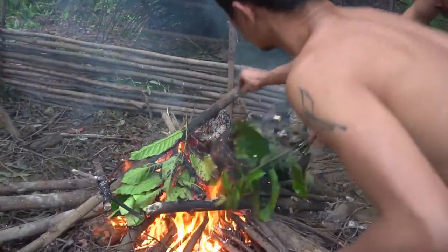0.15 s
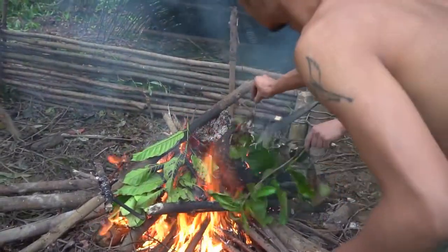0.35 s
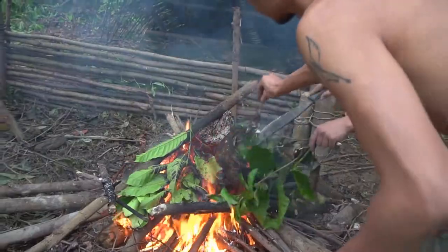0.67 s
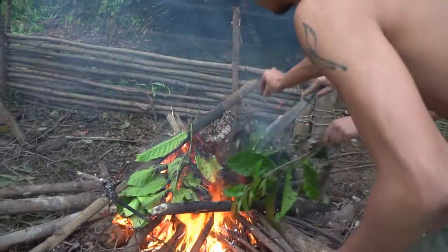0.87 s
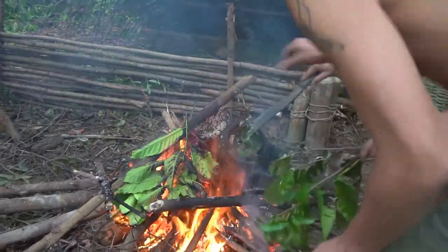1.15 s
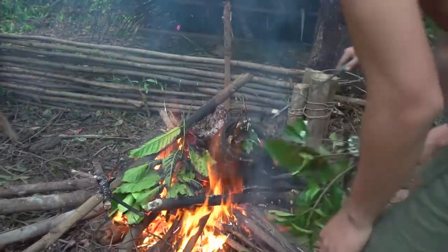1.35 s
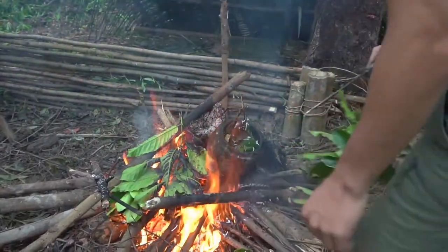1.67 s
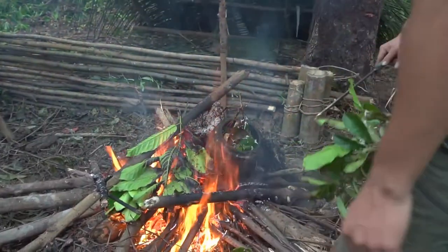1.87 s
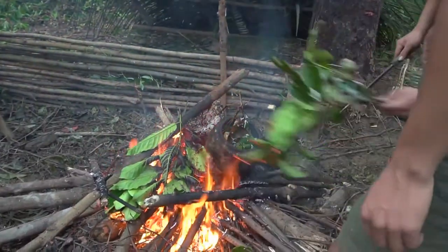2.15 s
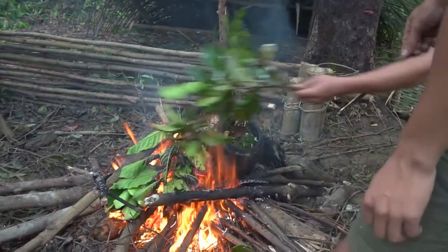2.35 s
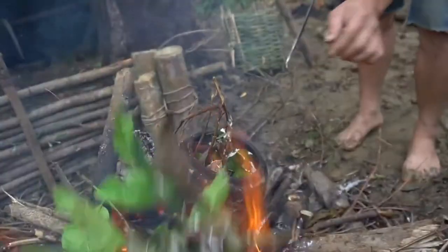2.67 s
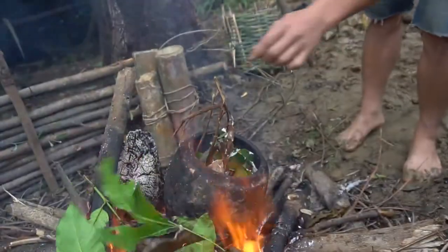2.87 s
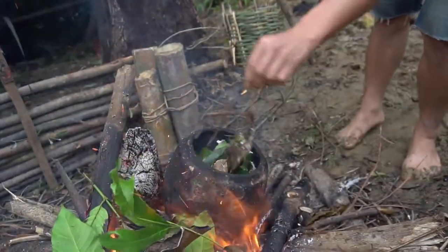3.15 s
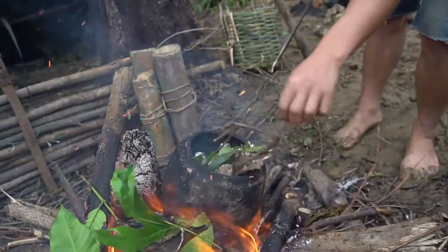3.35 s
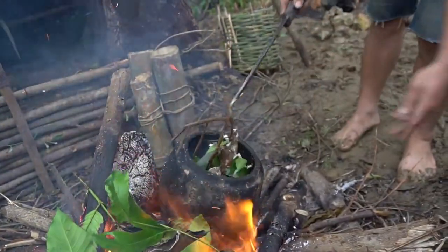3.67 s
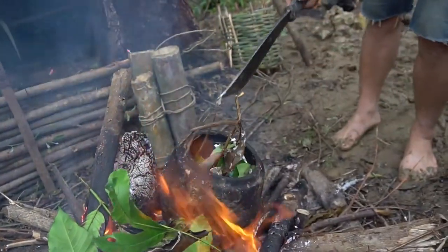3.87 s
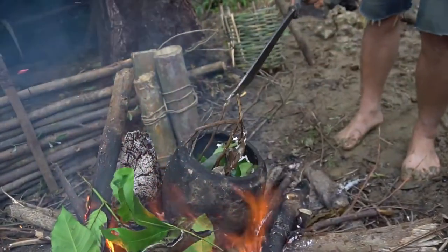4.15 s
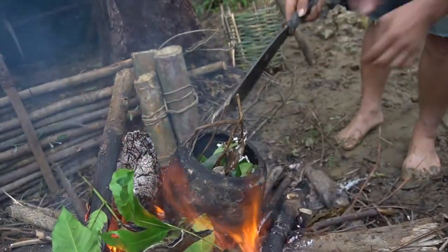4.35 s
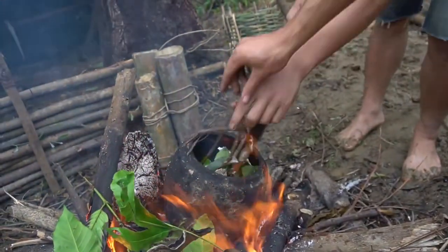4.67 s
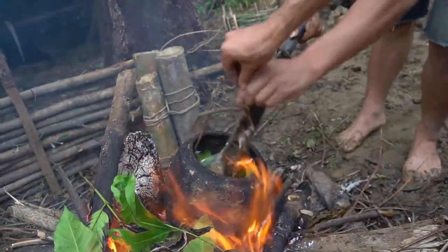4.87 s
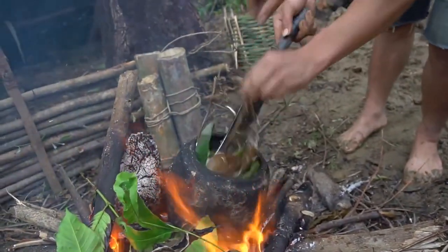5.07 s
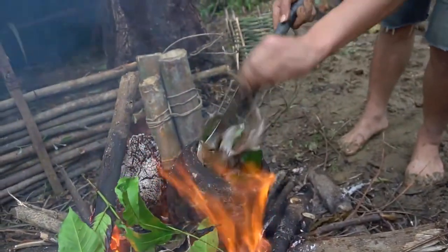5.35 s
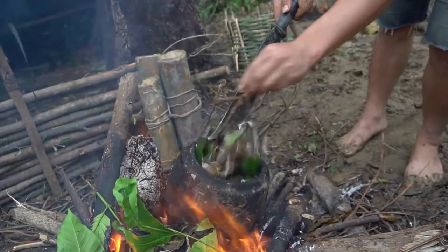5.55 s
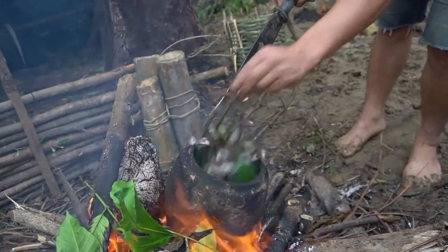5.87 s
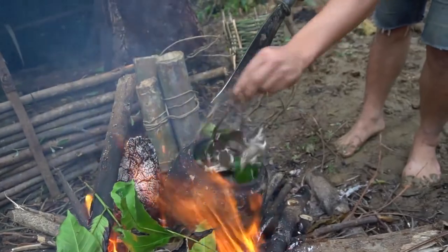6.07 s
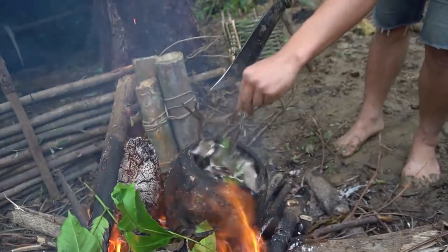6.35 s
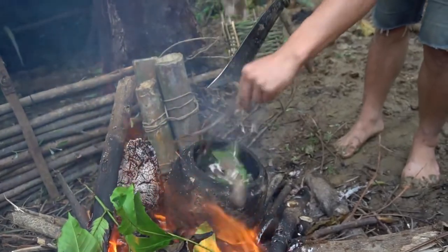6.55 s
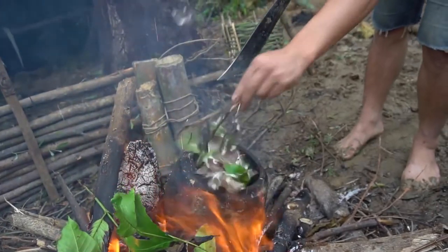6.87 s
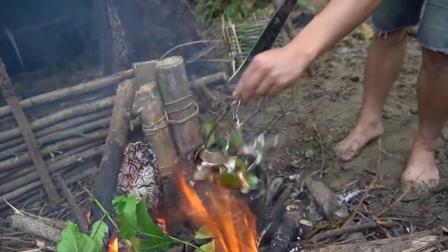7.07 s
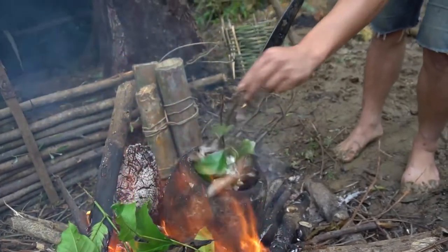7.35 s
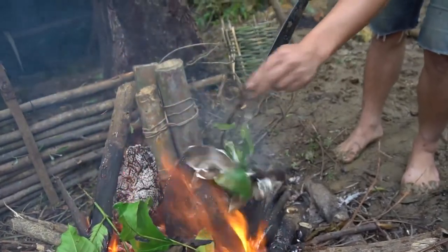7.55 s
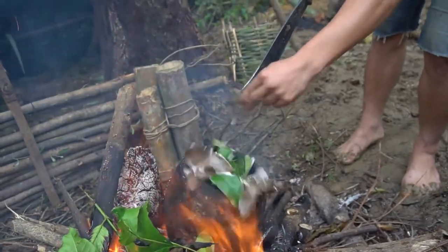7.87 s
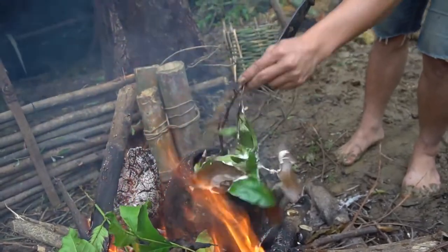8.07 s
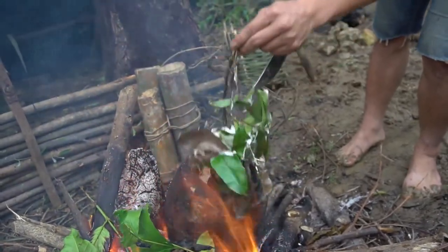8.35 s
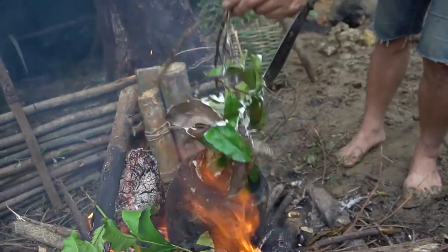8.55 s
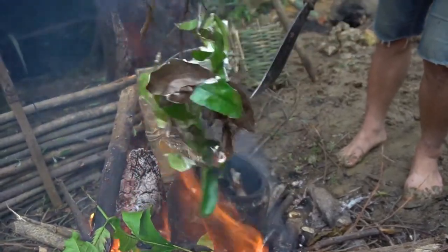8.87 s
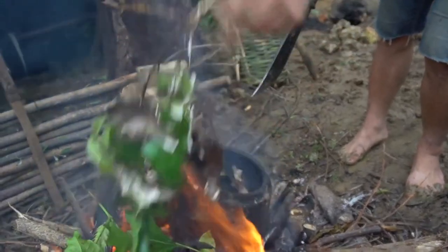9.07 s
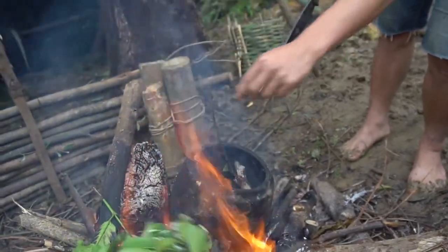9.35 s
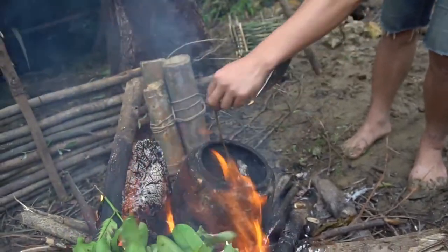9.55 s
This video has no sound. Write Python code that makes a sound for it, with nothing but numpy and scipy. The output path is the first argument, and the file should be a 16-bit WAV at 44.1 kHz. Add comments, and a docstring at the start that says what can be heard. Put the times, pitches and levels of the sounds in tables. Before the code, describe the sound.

Leafy twigs swish over the low flutter, steamy hiss and sharp pops of an open-air wood fire. Early on, a knife hits a metal pot and briefly scrapes the rim, slightly to the right. The rustling eases, then returns. About halfway, another ringing knock starts a stretch of stirring: the leaves rustle louder, the pot hums hollowly and twig tips plink against its wall. The rustle thins as the bunch is lifted out.

```python
"""A wood fire rumbles and hisses outdoors while leafy twigs rustle; sap pockets and green leaves pop.
A long knife knocks a metal pot with a dull boom and scrapes its rim, ringing both pot and blade.
Soft knocks follow and twig tips flick the wall. At a second knife knock the bunch goes into the pot
and is stirred: the hollow hums with the rustle and gulps as the bunch shifts, until it comes out."""
import sys
import numpy as np
from scipy import signal
from scipy.fft import rfft, irfft, next_fast_len
from scipy.io import wavfile
from scipy.ndimage import uniform_filter1d, map_coordinates

SR = 44100
rng = np.random.default_rng(int(sys.argv[2]) if len(sys.argv) > 2 else 0)


def generate_wav(sig):
    """Save sig (samples, or channels by samples) to the path in sys.argv[1] as 16-bit PCM at SR."""
    pcm = np.round(np.clip(np.atleast_2d(sig).T, -1, 1) * 32767).astype(np.int16)
    wavfile.write(sys.argv[1], SR, pcm)


N = 427769


def amp(db):
    return 10 ** (np.asarray(db) / 20)


def unit_rms(x):
    return x / np.sqrt(np.mean(x ** 2) + 1e-20)


def log_interp(points, hz):
    """Read (Hz, value) points on a log frequency axis."""
    point_hz, values = np.transpose(points)
    return np.interp(np.log(hz + 1), np.log(point_hz + 1), values)


def curves(rows):
    """One value per sample for each column after the time."""
    times_s, *columns = np.transpose(rows)
    return [np.interp(np.arange(N) / SR, times_s, column) for column in columns]


def wobble(rate_hz):
    """A smooth random curve."""
    knots = rng.standard_normal(int(N * rate_hz / SR) + 4)
    return map_coordinates(knots, [np.arange(N) * rate_hz / SR])


def filtered(x, response):
    size = next_fast_len(N + SR // 2)
    return irfft(rfft(x, size) * response(np.fft.rfftfreq(size, 1 / SR)), size)[..., :N]


def band(x, lo_hz, hi_hz):
    return signal.sosfilt(signal.butter(3, [lo_hz, hi_hz], "bandpass", fs=SR, output="sos"), x)


def spiky(per_s, spread_db, t60_s):
    """Envelope of tiny random bursts, a few much larger than the rest."""
    hits = (rng.random(N) < per_s / SR) * amp(spread_db * np.minimum(rng.exponential(size=N), 5))
    return unit_rms(signal.lfilter([1], [1, -amp(-60 / (t60_s * SR))], hits))


def rush(spectrum, likeness, envelope=1, patchy_db=0):
    """Stereo noise of rms 1, with optional louder and softer patches in time and frequency."""
    cells = signal.stft(envelope * rng.standard_normal((2, N)), nperseg=512)[2]
    patches = uniform_filter1d(rng.standard_normal(cells.shape[1:]), size=3, axis=0)
    patches = unit_rms(uniform_filter1d(patches, size=4, axis=1))
    noise = signal.istft(cells * amp(patchy_db * patches), nperseg=512)[1][:, :N]

    def mid_side_gains(hz):
        angle = np.arccos(np.clip(log_interp(likeness, hz), 0, 1)) / 2
        in_band = (hz > spectrum[0][0]) & (hz < spectrum[-1][0])
        return in_band * amp(log_interp(spectrum, hz)) * [np.cos(angle), np.sin(angle)]

    mid, side = filtered(noise, mid_side_gains)
    return unit_rms(np.array([mid + side, mid - side]))


def mix_at(starts, sounds):
    """Sum one sound per row, each from its start sample."""
    index = starts.astype(int) + np.arange(sounds.shape[1])
    return np.bincount(index.ravel(), sounds.ravel(), N)[:N]


def ticks(count, centre_hz, log_spread, cycles, spread_db):
    """Tiny contacts, each a damped sine of its own pitch, size and direction."""
    when, strength, direction = rng.random((count, 3)).T[:, :, None]
    hz = np.clip(centre_hz * np.exp(log_spread * rng.standard_normal((count, 1))), 1700, 15000)
    t = np.arange(300) / SR
    size = amp(spread_db * np.minimum(-np.log(1 - strength), 4))
    grains = size * np.sin(2 * np.pi * hz * t) * np.exp(-hz * t / cycles)
    pan = np.pi / 4 + 0.5 * (direction - 0.5)
    return unit_rms(np.array([mix_at(when * N, grains * gain) for gain in (np.cos(pan), np.sin(pan))]))


def ring(modes, level_db, tilt_db=0):
    """Modes decay after one blow; tilt_db per octave favours the high ones."""
    t = np.arange(SR // 2) / SR
    out = np.zeros(len(t))
    for hz, mode_db, t60_s in modes:
        start_db = level_db + mode_db + tilt_db * np.log2(hz / 1000) + rng.normal(0, 0.19)
        out += amp(start_db - 60 * t / t60_s) * np.sin(2 * np.pi * hz * t)
    return out


def pulse(start_s, level_db, hz, t60_cycles):
    """A short tone that builds within a cycle and dies away."""
    out, t = np.zeros(N + SR), np.arange(SR // 2) / SR
    attack = 1 - np.exp(-2 * hz * t)
    out[round(start_s * SR):][:len(t)] = attack * ring([(hz, 0, t60_cycles / hz)], level_db + 2)
    return out[:N]


# Flame strength. Each row: time in seconds, level in dB.
FLAME_LEVELS = [(0.0, -53), (8.43, -50), (9.7, -50.5)]
# Flame and steam spectra. Each row: frequency in Hz, density in dB.
RUMBLE_SPECTRUM = [(15, -44), (25, -9.5), (81, 0), (129, -1), (231, -5), (413, -20.5), (450, -15),
                   (580, -56), (990, -120)]
HISS_SPECTRUM = [(300, -26), (500, -2.5), (1200, -7.5), (1600, -0.5), (2400, -1), (6000, 1), (9000, 0.5),
                 (14400, 0.5), (15700, -2), (15900, -60)]
# Width of the fire. Each row: frequency in Hz, left-right likeness from 0 to 1.
FIRE_LIKENESS = [(40, .99), (120, 1), (300, 0.94), (1000, 0.083), (2200, 0.92), (4500, 0.37), (13000, 0.22)]


def fire():
    """Flames flutter in the bass; steam hisses from the wood with tiny spits."""
    rumble = amp(curves(FLAME_LEVELS)[0] + 2 * wobble(6)) * rush(RUMBLE_SPECTRUM, FIRE_LIKENESS)
    spits = amp(-56) * ticks(count=600, centre_hz=8800, log_spread=0.55, cycles=2.7, spread_db=1.5)
    hiss = amp(-48.5 + 1.1 * wobble(8)) * rush(HISS_SPECTRUM, FIRE_LIKENESS, patchy_db=3.5)
    return rumble + spits + hiss


# Steady stirring. Each row: time in seconds, rustle in dB, low rustle in dB above it.
STIRRING = [(0, -53, -10), (.3, -48.5, -22), (.62, -50.5, -6), (.8, -46.5, -8.5), (1.0, -48.5, -26),
            (1.25, -50.5, -7), (1.6, -59.5, -14.5), (2.7, -65, -13), (3.1, -53.5, -8), (4.2, -53.5, -14),
            (5.1, -48.5, -14), (5.25, -44.5, -4.5), (6.1, -39.5, -5), (7.0, -37.5, -6.5), (7.2, -45, -1.5),
            (7.9, -51.5, -0.5), (8.5, -53, -4.5), (8.7, -52, -14), (9.3, -59.5, -9.5), (9.7, -50.5, -10.5)]
# Sweeps of the bunch. Each row: peak time in seconds, level in dB, length in seconds, treble offset in dB.
SWEEPS = [(0.155, -44.5, 0.031, 1), (0.34, -44, 0.096, 1), (0.458, -36, 0.06, -4), (0.648, -36, 0.044, -6),
          (0.914, -51, .1, 10), (1.079, -33.5, 0.098, -3), (2.774, -46, 0.026, 4), (2.864, -32, .1, -3),
          (2.932, -38, 0.12, -3), (3.07, -41, 0.029, 7), (3.23, -56, 0.1, 7.5), (3.36, -52, .06, 6),
          (3.7, -48.5, 0.15, 1), (4.308, -43.5, 0.15, -3), (4.559, -40, 0.039, 0), (4.85, -52.5, 0.055, 5),
          (4.97, -45.5, .06, 1.5), (5.199, -34.5, 0.13, -0.5), (5.348, -35, 0.094, -4.5),
          (5.487, -37, 0.098, -8), (5.699, -32.5, 0.14, -2.5), (6.073, -33.5, 0.54, -2.5),
          (6.514, -33, 0.19, -0.5), (6.723, -35.5, 0.11, -3.5), (6.886, -32.5, 0.087, -11),
          (7.073, -28.5, 0.067, -5.5), (7.263, -35, 0.2, -5.5), (7.449, -37.5, .05, -2),
          (7.588, -40, 0.15, -5), (7.826, -40, 0.094, -11), (8.024, -38.5, 0.12, -3),
          (8.182, -42, 0.074, -8), (8.357, -49, 0.09, -12), (8.67, -49.5, 0.29, 5), (9.134, -53.5, .06, 8),
          (9.41, -38.5, 0.11, -2.5), (9.586, -46.5, 0.1, 3)]


def handling():
    """Sweeps swell over the stirring. Returns rustle, treble and low levels, and the share in the pot."""
    rise_db, fall_db = 19.5, 13  # per sweep length
    enter_s, leave_s, crossfade_s = 5.15, 8.62, 0.046
    t = np.arange(N) / SR
    steady_db, low_offset_db = curves(STIRRING)
    rustle_power, crisp_power = amp(2 * steady_db), amp(2 * (steady_db - 2))
    for peak_s, level_db, length_s, treble_db in SWEEPS:
        near = slice(max(round((peak_s - 1) * SR), 0), round((peak_s + 1) * SR))
        lengths = (t[near] - peak_s) / length_s
        power = amp(2 * (level_db + np.where(lengths < 0, rise_db, -fall_db) * lengths))
        rustle_power[near] += power
        crisp_power[near] += power * amp(2 * treble_db)
    rustle_db = 10 * np.log10(rustle_power)
    inside = np.clip(np.minimum(t - enter_s, leave_s - t) / crossfade_s, 0, 1)
    swell_share = 1 - 0.65 * inside  # only part of a swell reaches the hollow
    low_db = steady_db + swell_share * (rustle_db - steady_db) + low_offset_db
    return rustle_db, 10 * np.log10(crisp_power), low_db, inside


# Leaf spectra: body, treble, open-air lows. Each row: frequency in Hz, density in dB.
RUSTLE_SPECTRUM = [(500, -14), (900, -20), (1340, -11), (1430, -8.5), (2400, -5), (4000, -5), (6000, -8.5),
                   (9000, -15)]
CRISP_SPECTRUM = [(4000, -27), (6500, -8), (9000, -6), (14000, -14.5), (15700, -11), (15900, -64)]
LOW_SPECTRUM = [(250, -8), (450, -3.5), (700, -5), (1000, -8.5), (1340, -6)]
# Width of the bunch. Each row: frequency in Hz, left-right likeness from 0 to 1.
LEAF_LIKENESS = [(300, 1), (1000, 0.93), (2200, 1), (4500, 0.48), (13000, 0.56)]


def leaves():
    """Leaf and twig contacts are dense grains; the same grains sound low, crisp and in the pot."""
    rustle_db, crisp_db, low_db, inside = handling()
    grains = spiky(per_s=600, spread_db=3.5, t60_s=0.018)
    clumps = amp(1.65 * wobble(60))
    twigs = ticks(count=5000, centre_hz=3190, log_spread=0.408, cycles=4.6, spread_db=3)
    twigs = amp(-10.5 + 0.17 * (rustle_db - rustle_db.mean())) * band(twigs, 1700, 12600)
    body = rush(RUSTLE_SPECTRUM, LEAF_LIKENESS, clumps * (1.8 + grains), patchy_db=2.5)
    crisp = rush(CRISP_SPECTRUM, LEAF_LIKENESS, clumps * (1.16 + grains), patchy_db=2.5)
    open_air = rush(LOW_SPECTRUM, LEAF_LIKENESS, clumps * (0.72 + grains))
    low = inside * pot_hollow(grains) + (1 - inside) * open_air
    return amp(rustle_db) * (body + clumps * twigs) + amp(crisp_db) * crisp + amp(low_db) * low


# Sharp cracks: wood and sap pops, and the crack of the first knife knock. Each row: start in seconds,
# 3-6 kHz peak in dB, treble offset in dB, bass offset in dB, left over right in dB.
CRACKS = [(0.3457, -18, 5.5, -35, 0), (0.5697, -29, 8, -25, -3), (0.6362, -10, -4, -6.5, -3.5),
          (0.6875, -26, 7, -37, -7), (0.693, -11.5, 4.5, -46, -2), (0.7733, -21.5, 7.5, -16, -2),
          (0.8683, -22.5, 16, -8, -6), (0.877, -21.5, 16, -38, 9), (0.8842, -25, 15, -9, -8),
          (0.933, -25, 22.5, -14, 0), (0.9627, -24, 20, -21, -2), (0.99, -21.5, 17, -25, -1),
          (1.2533, -21.5, 6, -10, 0), (1.5358, -41.5, 21, -23, -1), (1.6619, -26, 9.5, -35, 0),
          (2.0266, -25.5, 10.5, -34, 0), (2.128, -35, 16, -25, 1), (2.222, -16.5, 2, -28, 1),
          (2.4952, -34, 15.5, -29, -1), (2.5532, -39.5, 21.5, -25, -1), (2.7459, -42, 19, -21, -2),
          (2.9868, -24, 9.5, -8, 1), (3.0558, -25, 6, -26, 6), (3.0672, -26, 3, 2.5, 1),
          (3.2834, -32.5, 11, -22, 1), (3.4019, -37.5, 14, -27, 0), (3.5468, -37, 16.5, -23, 2),
          (3.7088, -35, 14, -29, 3), (3.748, -33, -2, 1.5, 0), (3.85, -36.5, -8, 1.5, 0),
          (3.9036, -36, 12, -22, 0), (3.9322, -31, 13, -22, -5), (4.1618, -33, 13, -31, 1),
          (4.4489, -5, -10, -13.5, 0.5), (4.9795, -22.5, 1, -25, 4), (5.2663, -22, 6, -36, 0),
          (5.615, -37, 17, -27, 1), (5.82, -24, -8, -2, 0), (5.9074, -24, -16, 1, 2),
          (6.0423, -17, 3, -20, -1), (5.985, -26.5, -3, -18, -2), (6.1756, -20, -12, -9, -1),
          (6.2082, -7.5, -2, -9.5, 1.5), (6.4465, -18, -11, -45, 0), (6.7709, -5, -1.5, -15.5, -2),
          (6.81, -23, -6, 0.5, 2), (7.044, -19.5, -21, -27, -4), (7.3476, -26.5, 9, -32, 0),
          (7.4593, -10, 3, -12.5, 0), (7.6785, -39, 19, -25, 1), (7.7289, -34.5, 21.5, -33, 1),
          (8.0293, -11, 3.5, -24, -0.5), (8.4, -30, -16, -7, 0), (8.4867, -26.5, 9, -38, 1),
          (8.5374, -35, 12, -27, 6), (8.573, -28, 3, -6.5, 4), (8.6465, -23, 4, -20, 1),
          (8.7136, -22, 0, -43, 1), (8.729, -17, 9, -24, 2.5), (8.9268, -20, 6.5, -14, 1),
          (8.986, -20.5, 1, -46, -1), (9.0722, -39, 17, -26, 4), (9.1224, -20.5, 0, -15.5, 1),
          (9.2638, -34.5, 17, -35, 1), (9.304, -24, 2, -17, 0), (9.5599, -28, 20.5, -38, 3),
          (9.6632, -33, 13, -24, 5)]
# Small random pops. A row of means, then a row of deviations, for the four dB columns above.
SMALL_POP_DB = (-35.5, 11, -25, 9), (1, 4, 0, 1)


def cracks(small_count=10):
    """A pocket bursts or the knife hits: a sharp edge, a few ms of noise, scatter off logs and ground."""
    mean_db, deviation_db = SMALL_POP_DB
    small_s = rng.uniform(0, N / SR, small_count)
    small_db = mean_db + deviation_db * rng.standard_normal((small_count, 4))
    rows = np.vstack([CRACKS, np.column_stack([small_s, small_db])])
    start_s, level_db, treble_db, bass_db, pan_db = rows.T[:, :, None]
    thud_db = -1 + 0.34 * bass_db - 0.076 * treble_db
    t = np.arange(SR // 16) / SR
    noise = rng.standard_normal((len(rows), 2, len(t)))
    noise[:, 0, 0] = 5.24  # the edge
    burst = noise * (amp(-60 * t / 0.0082) + amp(-19 - 60 * t / 0.084))
    left, right = 0, 0
    for lo_hz, hi_hz, band_db, width in [(304, 1780, bass_db, 0.24), (1484, 2580, thud_db, 0.2),
                                         (3170, 6220, 0, 0.69), (7440, 15400, treble_db, 0.71)]:
        mid, side = band(burst, lo_hz, hi_hz).transpose(1, 0, 2)
        gain = amp(level_db + band_db) / np.abs(mid).max(axis=1, keepdims=True)
        left += gain * (mid + width * side) * amp(pan_db / 2)
        right += gain * (mid - width * side) * amp(-pan_db / 2)
    return np.array([mix_at(np.round(start_s * SR), channel) for channel in (left, right)])


# Low thumps. Each row: start in seconds, level in dB, pitch in Hz, t60 in cycles.
THUMPS = [(0.636, -25.5, 292, 33), (1.236, -33, 223, 8.9), (1.29, -29.5, 212, 8.3), (4.565, -35, 460, 10),
          (5.157, -18, 380, 12)]


def low_thumps():
    """The pot's dull boom under the knife blows, and a few other soft knocks: one damped mode each."""
    return sum(pulse(*row) for row in THUMPS)


# Pot and blade modes. Each row: frequency in Hz, level in dB, t60 in seconds.
POT_MODES = [(925, -8.5, .5), (937, -5.5, .5), (1220, -1.5, .14), (1620, -13, .07), (2160, -9, .09),
             (2402, -1.5, .12), (2800, -10, .06), (3600, -12, .07), (4400, -12, .07)]
BLADE_MODES = [(5210, -7, 0.12), (5960, -22, .06), (7300, -25, .07), (9010, 8.5, 0.099), (10950, 5, 0.14),
               (13000, -5, 0.1)]
# Knife blows. Each row: start in seconds, pot level in dB, tilt in dB per octave,
# blade offset in dB, signed drive of the lowest mode at the struck spot.
KNIFE_BLOWS = [(.637, -27.5, 2.5, -8.5, -1.3), (.652, -33.5, -13, -26, -0.86), (5.159, -23, 4, -2, 0.87)]


def knife_knocks():
    """Each blow cracks, then pot and blade ring."""
    out, t = np.zeros(N + SR), np.arange(SR // 10) / SR
    for start_s, level_db, tilt_db, blade_db, drive in KNIFE_BLOWS:
        blow = drive * ring(POT_MODES[:1], level_db, tilt_db) + ring(POT_MODES[1:], level_db, tilt_db)
        blow += ring(BLADE_MODES, level_db + blade_db)
        crack = band(rng.standard_normal(len(t)), 1200, 9100)
        blow[:len(t)] += amp(level_db + 7.5 - 60 * t / 0.038) * crack
        out[round(start_s * SR):][:len(blow)] += blow
    return out[:N]


# Blade pressure on the rim. Each row: time in seconds, level in dB.
SCRAPE_LEVELS = [(1.04, -93), (1.07, -48), (1.09, -40), (1.12, -44), (1.145, -38), (1.17, -59),
                 (1.19, -95.5)]


def knife_scrape():
    """Rough friction drives pot and blade; the resting blade shortens the pot's ring."""
    pressure = amp(curves(SCRAPE_LEVELS)[0])
    friction = pressure * rng.standard_normal(N) * (0.9 + spiky(per_s=950, spread_db=5, t60_s=0.003))
    damped_modes = [(hz, db, 0.7 * t60_s) for hz, db, t60_s in POT_MODES]
    metal = ring(damped_modes, -19.5, tilt_db=-3) + ring(BLADE_MODES, -43)
    return signal.fftconvolve(friction, metal)[:N] + amp(4) * band(friction, 870, 6300)


# Twig flicks. Each row: start in seconds, level in dB, pitch in Hz.
PLINKS = [(4.556, -35, 4300), (5.665, -21.5, 3650), (6.042, -20.5, 2750), (7.071, -21.5, 2300),
          (7.08, -20, 2460), (7.258, -18.5, 2630)]


def twig_plinks():
    """Twig tips flick the pot wall, which rings briefly."""
    return sum(pulse(*row, t60_cycles=47) for row in PLINKS)


# Air in the pot. Each row: frequency in Hz, density in dB.
HOLLOW_SPECTRUM = [(200, -5), (290, -14.5), (340, 4), (500, -6.5), (620, -12), (820, -18), (1150, -5),
                   (1340, -31.5)]


def pot_hollow(grains):
    """Leaf contacts make the pot's air hum; brushing the wall excites its modes and damps the longest."""
    air = rush(HOLLOW_SPECTRUM, LEAF_LIKENESS, amp(2.4 * wobble(21)) * (1.1 + grains))
    brushed_modes = [(hz, db, 1.4 * min(t60_s, 0.12)) for hz, db, t60_s in POT_MODES]
    wall = signal.fftconvolve(grains * rng.standard_normal(N), ring(brushed_modes, 0))[:N]
    return air + amp(-11.5) * unit_rms(wall)


# Air gulps. Each row: start in seconds, level in dB, pitch in Hz.
GULPS = [(7.422, -40, 350), (7.524, -36, 374), (7.6, -41, 353), (7.654, -39, 345), (7.829, -42, 385),
         (7.94, -47, 356), (8.02, -39, 358), (8.126, -39, 342), (8.456, -40, 355)]


def pot_gulps():
    """The pot's air gulps as the bunch shifts."""
    return sum(pulse(*row, t60_cycles=30) for row in GULPS)


def scene():
    knife = (knife_knocks() + knife_scrape()) * amp([[-0.6], [0.6]])  # slightly right
    return fire() + leaves() + cracks() + low_thumps() + knife + twig_plinks() + pot_gulps()


def record(dry):
    """The loudest pops round off near full scale; the top treble is cut."""
    ceiling, top_hz = 0.95, 16900
    rounded = dry / (1 + np.abs(dry / ceiling) ** 4) ** (1 / 4)
    return filtered(rounded, lambda hz: hz < top_hz)


dry = scene()
out = record(dry)
generate_wav(out)
```